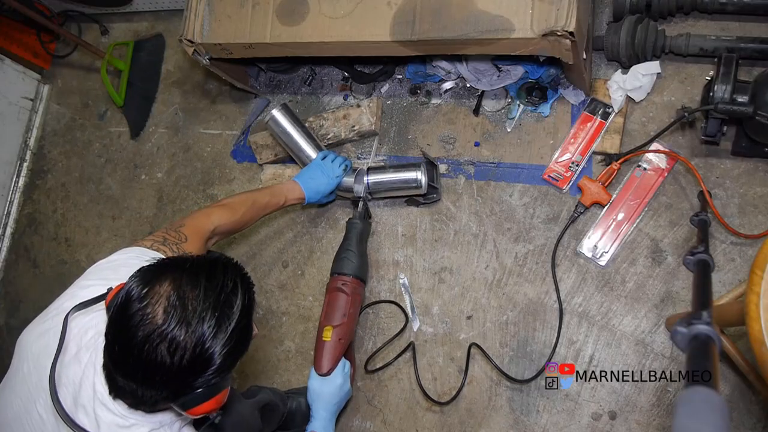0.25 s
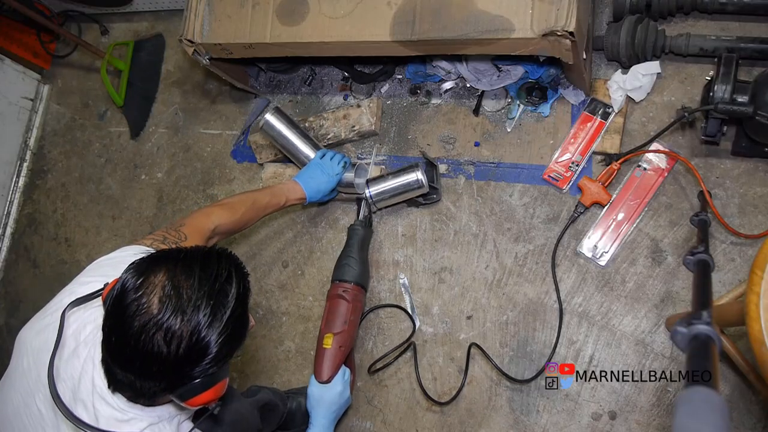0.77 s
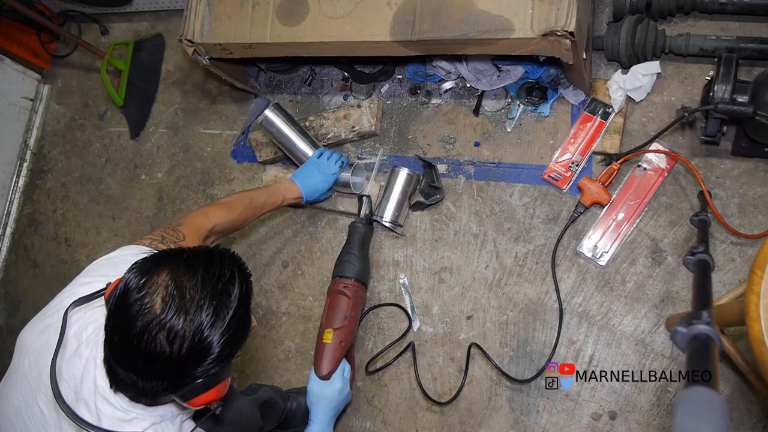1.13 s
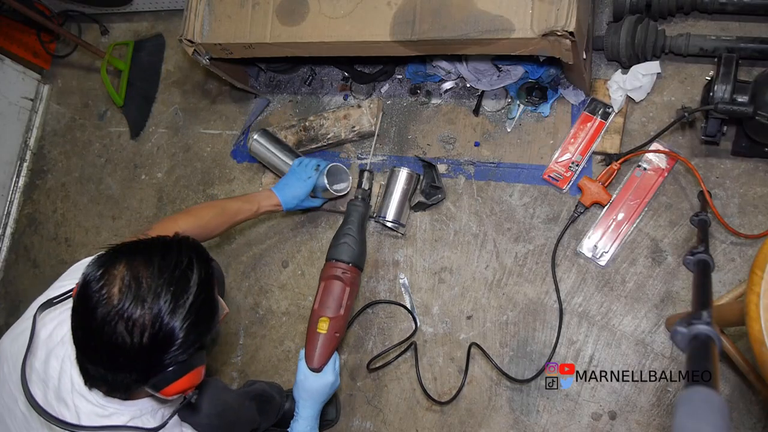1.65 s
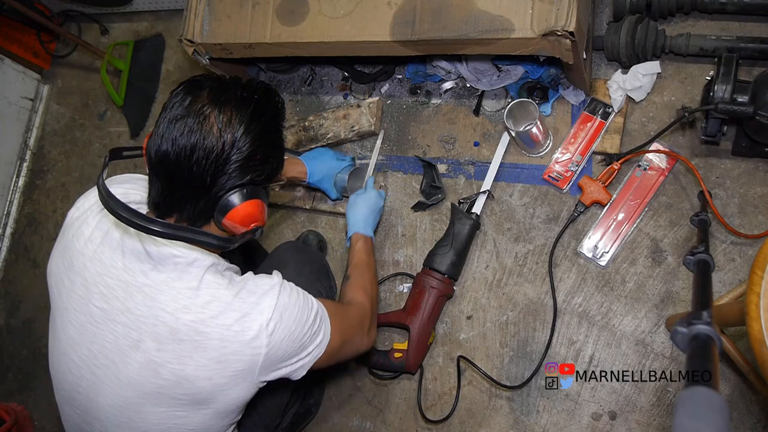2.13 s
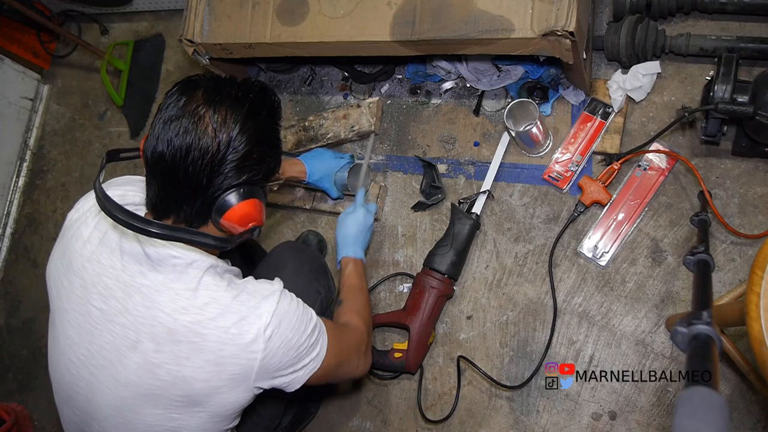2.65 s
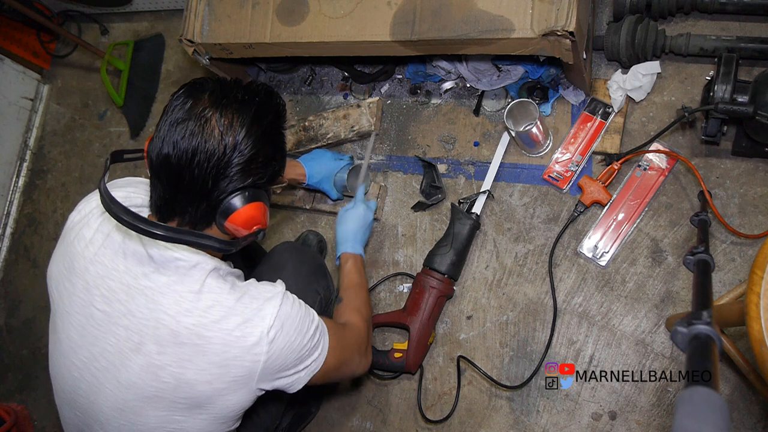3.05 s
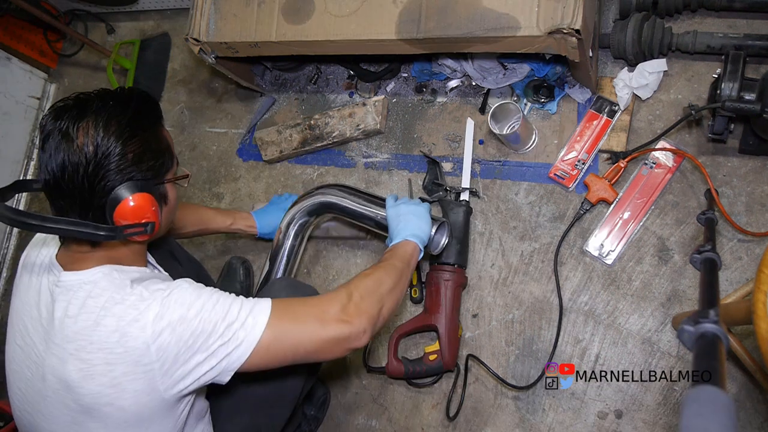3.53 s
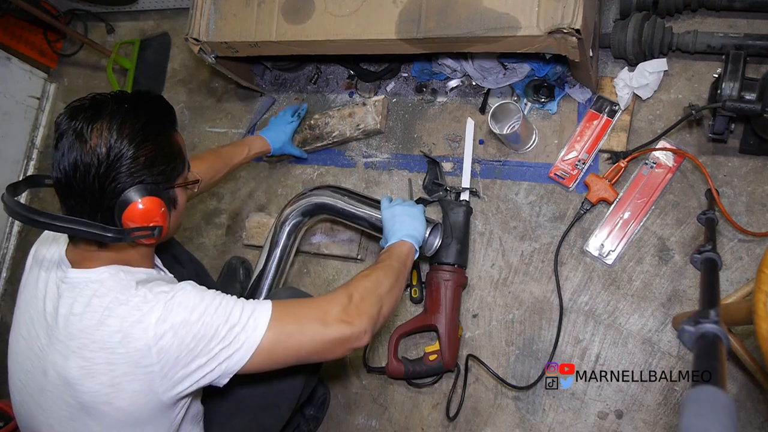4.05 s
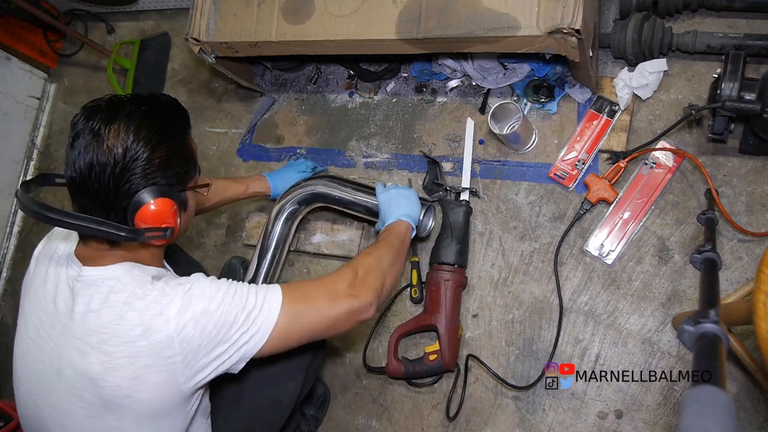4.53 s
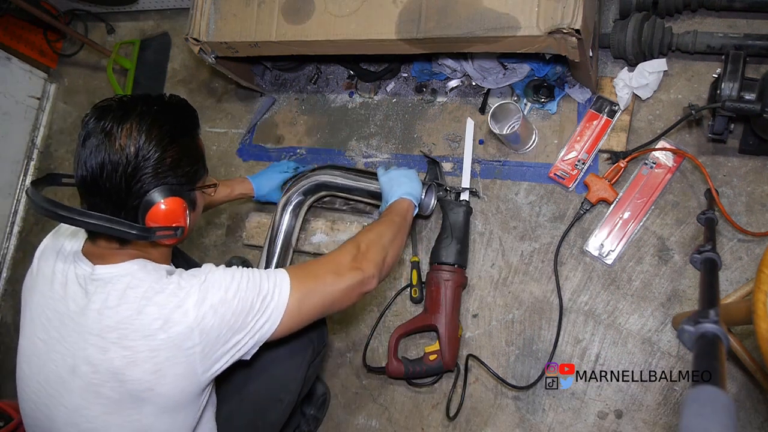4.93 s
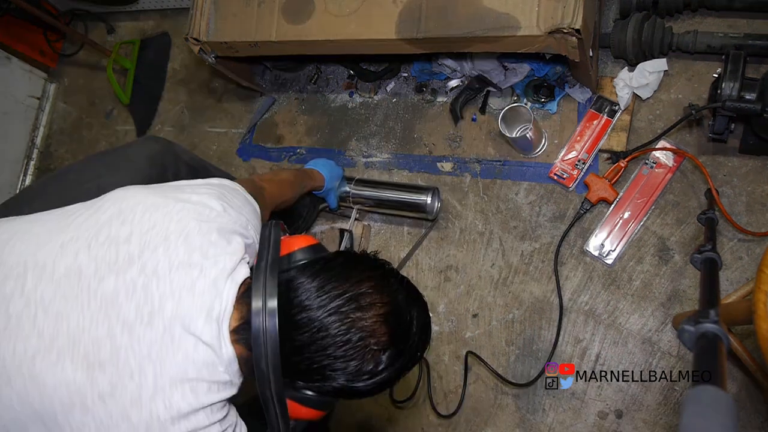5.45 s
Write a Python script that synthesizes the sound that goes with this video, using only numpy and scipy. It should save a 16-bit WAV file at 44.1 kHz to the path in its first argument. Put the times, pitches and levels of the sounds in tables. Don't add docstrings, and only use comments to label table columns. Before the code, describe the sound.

In a small hard garage, power sawing of aluminum pipe cuts abruptly to hand filing, quiet pipe shuffling on concrete, then a higher sawing buzz.

```python
import sys
import numpy as np
from scipy import signal
from scipy.fft import rfft, irfft, next_fast_len
from scipy.io import wavfile
from scipy.ndimage import uniform_filter1d

SR = 44100
rng = np.random.default_rng(int(sys.argv[2]) if len(sys.argv) > 2 else 0)


def wav_record(signal):
    frames = np.transpose(np.atleast_2d(signal))
    bounded = np.clip(frames, -1, 1)
    quanta = np.round(bounded * 32767).astype(np.int16)
    wavfile.write(sys.argv[1], SR, quanta)


def convert_level_to_amplitude(level_db):
    exponent = np.asarray(level_db, float) / 20
    return 10 ** exponent


N = 250488
T = np.arange(N) / SR


def colour(x, points, lo_hz=0, hi_hz=SR, unit=True):
    size = next_fast_len(len(x) + SR // 10)
    f = np.arange(size // 2 + 1) * SR / size + 1
    hz, db = np.transpose(points)
    edges = np.sqrt((1 + (lo_hz / f) ** 12) * (1 + (f / hi_hz) ** 12))
    gain = convert_level_to_amplitude(np.interp(np.log(f), np.log(hz), db)) / edges
    if unit:
        gain = gain / np.sqrt(np.mean(gain ** 2))
    return irfft(rfft(x, size) * gain, size)[:len(x)]


def walk(rate, size):
    hold = int(SR / rate)
    levels = rng.standard_normal(size // 100 + 1)[:size // hold + 1]
    return 1.2 * uniform_filter1d(np.repeat(levels, hold), hold)[:size]


def ring(x, modes, wander_db=0., sharp=1.):
    out, power = 0, 1e-12
    for k, (hz, width, db) in enumerate(modes):
        b, a = signal.iirpeak(hz, hz * sharp / width, fs=SR)
        drive = x * convert_level_to_amplitude(wander_db * walk(8.54, len(x)))
        out = out + (-1) ** k * convert_level_to_amplitude(db) * signal.lfilter(b, a, drive)
        power += convert_level_to_amplitude(2 * db) * np.pi * width / sharp / SR
    return out / np.sqrt(power)


# frequency_hz, density_db
AIR_SPECTRUM = [(12, -40), (35, -23), (55, -13), (332, -6), (611, -16.5), (683, -14.5), (785, -17),
                (877, -18), (1130, -24.5), (2450, -33.5), (11300, -41), (15400, -61)]
# start_s, end_s, depth_db, end_depth_db
DUCKS = [
    (0, 1.705, -12, -7.5),
    (5.08, 5.68, -5.5, -18),
]
AIR_DB = -64.5


def air():
    mid, side = (colour(rng.standard_normal(N), AIR_SPECTRUM) * convert_level_to_amplitude(2.2 * walk(6.7, N)) for _ in range(2))
    duck_db = sum(np.interp(T, (a, b), (db, end), left=0, right=0) for a, b, db, end in DUCKS)
    level = convert_level_to_amplitude(AIR_DB + uniform_filter1d(duck_db, SR // 50) + 3)
    return level * (mid + convert_level_to_amplitude(-15.0) * side * np.array([[1], [-1]]))


HUM_HZ, HUM_WIDTH_HZ, HUM_DB = 118.5, 8, -67.5


def fridge():
    modes = [(HUM_HZ, HUM_WIDTH_HZ, 0), (HUM_HZ / 2, HUM_WIDTH_HZ * 0.067, -4)]
    return convert_level_to_amplitude(HUM_DB) * ring(rng.standard_normal(N), modes) * (T > 1.705) * (T < 3.64)


# frequency_hz, side_minus_mid_db
WIDTH = [(60, -18), (110, -6.5), (200, -16), (380, -21.5), (700, -15.5), (1290, -9.5), (2370, -10),
         (4380, -10.5), (8080, -9), (14900, -1.5)]
TAKES_S = [0, 1.705, 3.545, 5.065, 5.68]
TAKE_PAN_DB = [1, 1, 1.3, 1.1]
ROOM_T60_S, ROOM_DB = 0.17, -7.5


def garage(dry, walls):
    out = np.zeros((2, N))
    t = T[:len(walls.T)]
    mid, side = walls * np.exp(-np.log(1000) * t / ROOM_T60_S) * (t > .003)
    mid = mid / np.linalg.norm(mid)
    side = colour(side / np.linalg.norm(side), WIDTH, unit=False)
    for t0, t1, pan_db in zip(TAKES_S, TAKES_S[1:], TAKE_PAN_DB):
        a, b = int(t0 * SR), min(int(t1 * SR), N)
        centre = dry[a:b] + convert_level_to_amplitude(ROOM_DB) * signal.fftconvolve(dry[a:b], mid)[:b - a]
        spread = convert_level_to_amplitude(1.0) * signal.fftconvolve(dry[a:b], side)[:b - a]
        left, right = (centre + spread) * convert_level_to_amplitude(pan_db / 2), (centre - spread) * convert_level_to_amplitude(-pan_db / 2)
        out[:, a:b] = convert_level_to_amplitude(-2.5) * np.array([left, right])
    return out


SPLIT_HZ, BASS_HZ = 2200, 900


def rasp(tables, grit, modes, ring_shares, grain_db, wander_db, gate=1, teeth=0, treble_bite=0.22, clump_db=0.1):
    out = np.zeros(N)
    gate, teeth = gate * np.ones(N), teeth * np.ones(N)
    low_ring, high_ring = np.clip(ring_shares, 0, 1)
    for table in tables:
        s, *columns = np.transpose(table)
        a = int(s[0] * SR)
        b = min(a + int(np.ceil(2 * (s[-1] - s[0] + .1))) * SR // 2, N)
        low_db, rel_db, *bass_db = (np.interp(T[a:b], s, c) for c in columns)
        chips = rng.standard_normal(b - a) * convert_level_to_amplitude(grain_db * walk(250, b - a) + clump_db * walk(45, b - a))
        on = T[a:b] < s[-1]
        chips *= on / chips.std()
        low = chips * gate[a:b] * convert_level_to_amplitude(low_db)
        high = chips * gate[a:b] ** treble_bite * convert_level_to_amplitude(low_db + rel_db)
        bands = [(high, high_ring, SPLIT_HZ, SR), (low, low_ring, BASS_HZ * len(bass_db), SPLIT_HZ)]
        bands += [(low * convert_level_to_amplitude(db), low_ring, 0, BASS_HZ) for db in bass_db]
        for x, share, lo, hi in bands:
            out[a:b] += colour(x * np.sqrt(1 - share), grit, lo, hi)
            out[a:b] += ring(x * np.sqrt(share), [m for m in modes if lo < m[0] < hi], wander_db)
        out[a:b] += teeth[a:b] * convert_level_to_amplitude(low_db) * on
    return out


def blows(events, tone, modes, crack_s, rattle_s, rattle_db, ring_db, thud_db, edge_db):
    out = np.zeros(N)
    t = T[:SR // 4]
    fade = np.clip(t * 1000, 0, 1) ** 2 * np.cos(2 * np.pi * t)
    for s, db, low_db, high_db in events:
        i = int(s * SR)
        decay = np.exp(-t / crack_s) + convert_level_to_amplitude(rattle_db) * np.exp(-t / rattle_s)
        push = convert_level_to_amplitude(db) * decay * np.sign(rng.standard_normal(len(t)))
        balance = [(400, low_db + thud_db), (1000, 0.0053), (1800, 0.0014), (3000, high_db + edge_db)]
        push = colour(np.roll(push, SR // 1000), balance, unit=False)
        struck = colour(push, tone) + convert_level_to_amplitude(ring_db) * ring(push, modes, sharp=1.5)
        out[i:i + len(t)] += struck * fade
    return out


def clangs(events, modes):
    out = np.zeros(N + SR)
    t = T[:SR // 2]
    for hz, rel_db, t60 in modes:
        pair = np.sin(2 * np.pi * hz * t) + .25 * np.sin(2 * np.pi * hz * 1.017 * t)
        for s, db in events:
            out[int(s * SR):][:len(t)] += convert_level_to_amplitude(db + rel_db - 60 * t / t60) * pair
    return out[:N]


def squeals(events):
    out = np.zeros(N + SR)
    t = T[:SR] - .5
    for s, length, hz, db in events:
        swell = np.exp(-(2 * t / length) ** 4)
        wobble = hz * (1 + 0.0028 * walk(110, SR))
        level = convert_level_to_amplitude(db + 3 + 2.5 * walk(90, SR))
        out[int(s * SR):][:SR] += level * swell * np.sin(2 * np.pi * np.cumsum(wobble) / SR)
    return out[SR // 2:][:N]


# middle_s, length_s, pitch_hz, level_db
SAW_SQUEALS = [(.44, .22, 1080, -41), (.4, .15, 1640, -46), (.55, .05, 5110, -41), (.55, .05, 4840, -43),
               (.53, .1, 6480, -43), (.62, .22, 8190, -43), (.7, .05, 4970, -38), (.7, .05, 5105, -42),
               (.7, .06, 5470, -40), (.72, .08, 6725, -43), (.7, .04, 9390, -46), (.6, .25, 2700, -46),
               (.6, .25, 2970, -47), (.215, .02, 5250, -38), (.19, .06, 4960, -43), (.435, .015, 5450, -43),
               (.8, .1, 6555, -46), (.82, .1, 6735, -46), (.95, .11, 5150, -37), (.92, .09, 6465, -40),
               (.93, .1, 4160, -48), (.95, .15, 9600, -49), (1., .08, 6745, -43), (1., .05, 5485, -47),
               (1.05, .07, 6500, -45), (1.15, .06, 4970, -44), (1.23, .08, 5150, -37),
               (1.24, .14, 5760, -38), (1.38, .15, 5760, -48), (1.245, .06, 6540, -39),
               (1.24, .07, 6730, -43), (1.225, .05, 5465, -38), (1.34, .07, 5465, -41),
               (1.45, .12, 5465, -46), (1.47, .06, 6540, -44), (1.24, .06, 7450, -47),
               (1.24, .05, 8200, -45), (1.27, .2, 945, -43), (1.31, .26, 2890, -47), (1.44, .32, 4190, -43),
               (1.19, .1, 2900, -45), (.66, .06, 1100, -42), (1.61, .1, 3850, -46)]
# middle_s, length_s, pitch_hz, level_db
HAND_SQUEALS = [(3.335, .06, 4800, -46), (2.93, .05, 5400, -43), (2.9, .04, 1330, -38),
                (2.14, .07, 520, -38), (2.04, .06, 1680, -40), (2.46, .07, 728, -36),
                (2.525, .05, 530, -47), (2.03, .08, 730, -42), (3.28, .07, 730, -43),
                (2.97, .14, 1680, -51), (2.47, .08, 1555, -39), (2.9, .07, 1555, -36),
                (3.7, .09, 1420, -50), (3.77, .05, 2730, -53), (4.625, .07, 1175, -59),
                (4.765, .04, 1175, -53), (4.835, .07, 1175, -53), (4.9, .08, 1175, -56),
                (4.98, .07, 1175, -54), (4.72, .04, 1175, -67), (3.35, .08, 1660, -43),
                (3.29, .05, 1330, -41), (3.285, .06, 2800, -41), (3.165, .03, 1000, -41),
                (3.03, .16, 990, -64)]


def pipe_squeals():
    return squeals(SAW_SQUEALS + HAND_SQUEALS)


HAND_RISE_S, HAND_RISE_DB, HAND_FALL_S, HAND_FALL_DB = 0.0087, -12.5, 0.15, -40.5


def shuffle(full, go, db, end_db, treble_db):
    return [(full - HAND_RISE_S, db + HAND_RISE_DB, treble_db), (full, db, treble_db), (go, end_db, treble_db),
            (go + HAND_FALL_S, end_db + HAND_FALL_DB, treble_db)]


# full_pressure_s, let_go_s, level_db, let_go_level_db, treble_db
BLOCK = [
    (4.132, 4.156, -58.5, -58.5, 3.5),
    (4.172, 4.19, -72, -69, 4),
    (4.2, 4.234, -59.5, -58.5, 4.7),
]
# frequency_hz, density_db
BLOCK_GRIT = [(530, -41), (900, -19), (1380, -12.5), (1480, -15), (1750, -17), (2990, -12), (11000, -18),
              (15400, -30)]
# frequency_hz, width_hz, level_db
DRAG_RING = [(1235, 47, 1), (1363, 160, 2.5), (2740, 41, -12.5), (3350, 68, -6.5), (4100, 100, -14),
             (4760, 120, -15), (5300, 75, -15.5), (5730, 46, -15), (7200, 170, -19), (7850, 81, -5.5)]


def slid_block():
    return rasp([shuffle(*row) for row in BLOCK], BLOCK_GRIT, DRAG_RING, (.05, .03), 1.5, 2.9)


# full_pressure_s, let_go_s, level_db, let_go_level_db, treble_db
DRAG = [
    (3.547, 3.595, -50.5, -51.5, -3),
    (3.623, 3.655, -46, -51.5, -6),
    (3.664, 3.736, -46.5, -50, 2),
    (3.762, 3.805, -44.5, -54.5, -7),
]
# frequency_hz, density_db
DRAG_GRIT = [(530, -57), (900, -24.5), (1400, 13), (1990, -32), (2680, -6), (3090, -20), (5600, -10),
             (15400, -19.5)]
# start_s, peak_db, weight_db, edge_db
DRAG_TAPS = [
    (3.66, -40, -19, -12),
    (3.6938, -41.5, -34, -11),
    (3.716, -39.5, -28, -4),
    (3.7669, -40.5, -5, -20),
    (3.783, -42.5, -14, -25),
]
# frequency_hz, density_db
SLAP = [(59, -51.5), (100, -15.5), (1510, 4), (2510, -9.5), (2850, 5), (4080, -16), (4530, -7.5),
        (6340, -20.5), (8340, -18.5), (9270, -26), (12200, -38.5), (15400, -48)]
# pitch_hz, level_db, t60_s
DRAG_CLANG = [(1440, -2, .07), (1290, -6, .1), (2750, -11, .14)]
# pitch_hz, level_db, t60_s
DRAG_TINKLE = [(5720, -11, .09), (5150, -16, .09), (4100, -20, .08), (3300, -20, .06)]


def dragged_pipe():
    out = rasp([shuffle(*row) for row in DRAG], DRAG_GRIT, DRAG_RING, (.6, .3), 3.4, 2.3)
    out += blows(DRAG_TAPS, SLAP, DRAG_RING, 0.00046, 0.014, -15.5, 0.5, 26.0, -3)
    out += clangs([row[:2] for row in DRAG_TAPS], DRAG_CLANG)
    out += clangs([(s, db + edge + 8) for s, db, weight, edge in DRAG_TAPS], DRAG_TINKLE)
    song = [((a + b) / 2, 0.94 * (b - a), 1245, (db + end) / 2 - 1) for a, b, db, end, _ in DRAG]
    return out + squeals(song)


# full_pressure_s, let_go_s, level_db, let_go_level_db, treble_db
NUDGE = [
    (4.485, 4.502, -42, -58.5, -5.5),
    (4.591, 4.606, -53.5, -71.5, 12),
    (4.65, 4.721, -79, -77, 10.5),
    (4.751, 4.901, -72.5, -63, 9),
    (4.907, 5.072, -65.5, -69, 9),
]
# frequency_hz, density_db
NUDGE_GRIT = [(530, -53), (900, -68), (1150, 15), (1460, 0), (2300, -14), (2920, -17.5), (3440, -30),
              (5470, -23), (15400, -41)]
# frequency_hz, width_hz, level_db
NUDGE_RING = [(1180, 25, 0), (1900, 38, -21), (2870, 61, -10), (4190, 64, -26), (4550, 51, -25),
              (5380, 50, -21), (5600, 140, -27), (6370, 170, -29), (7630, 120, -30)]
# start_s, peak_db, weight_db, edge_db
NUDGE_TAPS = [(4.4788, -32, 14.5, -9.5), (4.552, -51.5, -15, 1), (4.5843, -45, 10, 1), (4.696, -62, -12, 0),
              (4.7443, -55, -11, 7), (4.796, -54, -17, -3), (4.815, -57, -15, 5), (4.832, -51, -11, 6),
              (4.875, -62, -15, 3), (4.8563, -53, -20, 6), (4.898, -53, -19, 9), (4.92, -56, -17, -1),
              (4.947, -40.5, -17, 0), (4.964, -53, -18, 5), (5.0142, -44, -28, 8.5), (5.041, -48, -15, 11),
              (5.058, -38, -16, -4)]
# frequency_hz, density_db
TAP = [(100, -16.5), (1200, 4.5), (2200, -7), (3100, 6), (3600, -14), (5400, -19), (8300, -15),
       (15400, -52)]
# pitch_hz, level_db, t60_s
TAP_BELL = [(1172, -4, .2)]
# pitch_hz, level_db, t60_s
TAP_EDGE = [(2880, -10, .08), (2250, -20, .05), (3150, -17, .04), (4190, -19, .12), (4560, -23, .1),
            (5380, -19, .1)]


def nudged_pipe():
    out = rasp([shuffle(*row) for row in NUDGE], NUDGE_GRIT, NUDGE_RING, (.7, .3), 5.6, 2.5)
    out += blows(NUDGE_TAPS, TAP, NUDGE_RING, 0.0004, 0.0087, -11, -1.1, 2.1, 2.1)
    out += clangs([(s, db + .42 * weight) for s, db, weight, edge in NUDGE_TAPS], TAP_BELL)
    return out + clangs([(s, db + edge) for s, db, weight, edge in NUDGE_TAPS], TAP_EDGE)


FILE_TREBLE_DB = (-6.5, 5, 0, -1.5, 4)
FILE_BASS_DB = (-11, 8.5, -4, -3.5, -4)
FILE_LAND_S, FILE_RISE_S, FILE_FALL_S, FILE_REST_DB, FILE_FALL_DB = .03, 0.023, 0.22, -44, -52.5


def file_push(full, go, db, end_db, bass_db):
    s = [full - FILE_RISE_S - FILE_LAND_S, full - FILE_RISE_S, full, go, go + FILE_FALL_S]
    level = [min(FILE_REST_DB, db - 17.0)] * 2 + [db, end_db, end_db + FILE_FALL_DB]
    return np.transpose([s, level, FILE_TREBLE_DB, bass_db + np.array(FILE_BASS_DB)])


# full_pressure_s, let_go_s, level_db, let_go_level_db, bass_db
FILING = [
    (1.703, 1.706, -44.5, -52, -1),
    (2, 2.05, -28.5, -32.5, -5),
    (2.11, 2.138, -34.5, -43, 5.5),
    (2.438, 2.472, -30, -33, -0.5),
    (2.495, 2.506, -33, -40, -5.5),
    (2.851, 2.863, -31.5, -31, 1.5),
    (2.889, 2.907, -28, -32, -7.5),
    (3.263, 3.331, -31, -37, -0.5),
]
# frequency_hz, density_db
FILE_GRIT = [(120, -59), (200, -24.5), (524, 1.5), (840, -9), (1590, -2), (2450, -15.5), (2790, 4),
             (3860, -8), (5260, -5.5), (12100, -28.5), (15400, -39)]
# frequency_hz, width_hz, level_db
FILE_RING = [(530, 50, 4), (730, 50, 3.5), (990, 60, -13), (1306, 40, 2), (1540, 50, 2), (1670, 40, 2),
             (2740, 24, 6), (2860, 50, 2), (3420, 60, -7), (4600, 160, -6), (5400, 90, -3), (6720, 60, -7),
             (8400, 160, -7), (12000, 280, -13)]
# frequency_hz, width_hz, level_db
STEEL_RING = [(6100, 50, -12), (7330, 45, -11), (9710, 60, -16), (10200, 50, -18), (11000, 130, -16)]
# start_s, peak_db, weight_db, edge_db
SLAPS = [
    (1.905, -20, -20, -5.5),
    (2.351, -16, -17.5, -13),
    (2.763, -16.5, -17, -13),
    (3.144, -18.5, -14.5, -12),
]
# pitch_hz, level_db, t60_s
SLAP_CLANG = [(2900, -30, .18)]
# pitch_hz, level_db, t60_s
LIFT_CLANG = [(2740, -16, .26), (3418, -23, .23), (5390, -13, .23), (1650, -8, .25), (8250, -22, .12),
              (4700, -20, .15)]


def file():
    pushes = [file_push(*row) for row in FILING]
    out = rasp(pushes, FILE_GRIT, FILE_RING + STEEL_RING, (.5, .55), 0.98, 2.5, clump_db=0.87)
    out += blows(SLAPS, SLAP, FILE_RING, 0.0015, 0.022, -8.5, -14, 13.3, 11.2)
    out += clangs([row[:2] for row in SLAPS], SLAP_CLANG)
    return out + clangs([(go, db) for full, go, _, db, bass in FILING], LIFT_CLANG)


TEETH_PER_STROKE = 64


def strokes(motion, bite_s):
    s, *columns = np.transpose(motion)
    hz, depth_db, tooth_db, chatter_hz, chatter_db = (np.interp(T, s, c) for c in columns)
    turns = np.cumsum(hz) / SR
    turns -= np.interp(bite_s, T, turns)
    luck = rng.standard_normal((600, 2))[np.round(turns).astype(int) + 300].T
    forward = (1 + np.cos(2 * np.pi * turns)) / 2
    gate = convert_level_to_amplitude(depth_db * (forward ** 1.8 + .07 * luck[0] * forward))
    gate /= np.sqrt(uniform_filter1d(gate ** 2, SR // 12))
    speed = 1.02 + .075 * np.sin(2 * np.pi * turns + .5) + .015 * luck[1] + .008 * walk(300, N)
    tooth_hz = TEETH_PER_STROKE * hz * speed
    tooth_level = convert_level_to_amplitude(tooth_db) * np.cos(np.pi * turns + .2) ** 4
    teeth = tooth_level * np.sin(2 * np.pi * np.cumsum(tooth_hz) / SR)
    chatter_hz = chatter_hz * (1 + .008 * luck[1] + .014 * walk(200, N))
    chatter_level = convert_level_to_amplitude(chatter_db + .8 * luck[0] + 1.2 * walk(400, N)) * (.15 + .85 * forward ** 3)
    chatter = chatter_level * np.sin(2 * np.pi * np.cumsum(chatter_hz) / SR)
    return gate, 2 * (teeth + chatter)


def by_grip(motion, law):
    return [(s, hz, *(slip + grip * (bite - slip) for slip, bite in law)) for s, hz, grip in motion]


# time_s, stroke_rate_hz, grip_0_to_1
SAW = [
    (0, 25.6, 0.04),
    (.1, 26.45, 0.68),
    (.35, 28, 1),
    (.62, 28.8, 0.78),
    (.75, 29.1, 0.14),
    (1.15, 29.1, 0.2),
    (1.27, 44.66, 0),
    (1.7, 43.5, 0.86),
]
SAW_LAW = [(2, 7.5), (-24, -7), (1000, 1080), (-28, 2)]
# time_s, level_db
CUT = [(0, -33.5), (.2, -35), (.24, -38.5), (.32, -35.5), (0.551, -37.5), (.66, -36.5), (.705, -40),
       (.77, -36), (1.19, -37)]
# time_s, level_db
FREE = [
    (1.17, -34),
    (1.2, -41),
    (1.265, -40),
    (1.706, -39.5),
]
# frequency_hz, density_db
CUT_GRIT = [(88, -19), (150, -14), (373, -7.5), (480, -2.5), (720, -0.5), (1420, -0.5), (2350, -17),
            (5100, -13), (6070, -19), (6550, -17), (12200, -26), (15400, -35.5)]
# frequency_hz, density_db
FREE_GRIT = [(88, -72), (150, -34), (560, -9.5), (2490, -10), (2960, -1), (3330, -3.5), (4200, 2),
             (5610, -4), (9290, -8.5), (12200, -14.5), (15400, -24.5)]
# frequency_hz, width_hz, level_db
CUT_RING = [(520, 80, 0), (1090, 90, -1), (1680, 90, -3), (2720, 170, -3), (3000, 140, -4), (3580, 130, -4),
            (4550, 170, -6), (4960, 80, -1), (5250, 120, -2), (5600, 90, -5), (6480, 90, -2),
            (6730, 60, -5), (8250, 120, -6), (9500, 200, -11)]
# frequency_hz, width_hz, level_db
FREE_RING = [(945, 37, -16.5), (2890, 60, -11), (3780, 72, -6.5), (4190, 30, -2), (5150, 47, -3),
             (5465, 27, -2), (5760, 20, -3), (6540, 60, -6), (6730, 23, -6), (8250, 33, -9),
             (11540, 45, -13.5), (12200, 90, -18)]
# start_s, peak_db, weight_db, edge_db
DROP = [
    (1.191, -28.5, 0.0041, 1.7),
]
CUT_TREBLE_DB, CUT_TREBLE_FOLLOW = -33.5, 0.72
BREAK_S, BREAK_DB, BREAK_LENGTH_S = 1.22, 4, .04


def first_cut():
    gate, teeth = strokes(by_grip(SAW, SAW_LAW), bite_s=.1)
    middle = np.mean(CUT, axis=0)[1]
    cut = [(s, db, CUT_TREBLE_DB + CUT_TREBLE_FOLLOW * (db - middle) - db) for s, db in CUT]
    free = [(s, db, BREAK_DB * (abs(s - BREAK_S) < BREAK_LENGTH_S)) for s, db in FREE]
    out = rasp([cut], CUT_GRIT, CUT_RING, (.2, .3), 2.0, 0.53, gate, teeth)
    out += rasp([free], FREE_GRIT, FREE_RING, (.05, .12), 1.0, 2.3, gate, teeth)
    return out + blows(DROP, SLAP, FREE_RING, 0.0092, 0.0086, -1.6, -5.5, -0.5, 0)


# time_s, stroke_rate_hz, grip_0_to_1
RESAW = [(5.066, 40.2, .55), (5.11, 40.15, .8), (5.17, 40.09, .35), (5.3, 39.95, .85), (5.35, 40, .75),
         (5.4, 40.08, .05), (5.45, 40.25, .2), (5.5, 40.47, .75), (5.59, 40.8, .9), (5.68, 41, .1)]
RESAW_LAW = [(5, 6), (-7, 7), (1280, 1270), (6, 7)]
# slipping_db, biting_db
RECUT_DB = (-40, -37.5)
# slipping_db, biting_db
RECUT_TREBLE_DB = (3.5, 4)
# frequency_hz, density_db
RECUT_GRIT = [(88, -80), (150, -31), (313, -17), (560, -9), (945, -7), (1260, -3), (1830, -19), (2600, -14),
              (2960, -16), (7360, -21), (12000, -30), (15400, -46)]
# frequency_hz, width_hz, level_db
RECUT_RING = [(318, 22, -14), (565, 50, -9), (920, 40, 0), (1112, 30, -2), (1231, 25, 3), (1280, 25, 3),
              (2410, 60, -16), (2580, 150, -19), (3440, 70, -12), (3940, 34, -3), (4350, 50, -10),
              (4900, 54, -10), (6260, 120, -16), (7130, 74, -15)]
# middle_s, length_s, pitch_hz, level_db
RECUT_SINGS = [(5.085, .07, 3430, -39), (5.2, .3, 915, -44), (5.5, .3, 965, -47), (5.2, .3, 1110, -43),
               (5.56, .1, 1116, -43), (5.225, .05, 3940, -44), (5.345, .025, 3940, -41),
               (5.5, .04, 3990, -46), (5.32, .02, 4450, -43), (5.515, .02, 4300, -44),
               (5.4, .025, 4900, -46), (5.33, .04, 4900, -48), (5.195, .02, 3430, -44),
               (5.242, .02, 3500, -42), (5.365, .02, 4350, -46), (5.4, .6, 565, -50), (5.55, .2, 1340, -45)]


def second_cut():
    gate, teeth = strokes(by_grip(RESAW, RESAW_LAW), bite_s=5.0695)
    recut = [(s, db, treble) for s, hz, db, treble in by_grip(RESAW, [RECUT_DB, RECUT_TREBLE_DB])]
    out = squeals(RECUT_SINGS) * np.sqrt(gate) * (T > RESAW[0][0])
    return out + rasp([recut], RECUT_GRIT, RECUT_RING, (.2, .15), .8, 1.5, gate, teeth, treble_bite=0.3)


# frequency_hz, right_minus_left_db
RIGHT_DB = [(300, 1), (1000, 1.76), (8000, 1.5), (12000, 1.5)]


def scene():
    walls = rng.standard_normal((2, SR // 2))
    hands = slid_block() + dragged_pipe() + nudged_pipe()
    left, right = garage(pipe_squeals() + hands + file() + first_cut() + second_cut(), walls)
    work = np.array([left, colour(right, RIGHT_DB, unit=False)])
    work = signal.sosfilt(signal.butter(3, 150, "high", fs=SR, output="sos"), work)
    return work + air() + fridge()


def low_pass(x):
    return signal.sosfilt(signal.butter(12, 15520, fs=SR, output="sos"), x)


# frequency_hz, width_hz, share_cancelled_0_to_1
NOTCHES = [(9050, 650, .98), (12600, 350, .9)]


def record(dry):
    heard = dry
    for hz, width, share in NOTCHES:
        b, a = signal.iirpeak(hz, hz / width, fs=SR)
        heard = heard - share * signal.lfilter(b, a, heard)
    heard = signal.sosfilt(signal.ellip(8, .2, 60, 15450, fs=SR, output="sos"), heard)
    return low_pass(heard)


dry = scene()
out = record(dry)
wav_record(out)
```